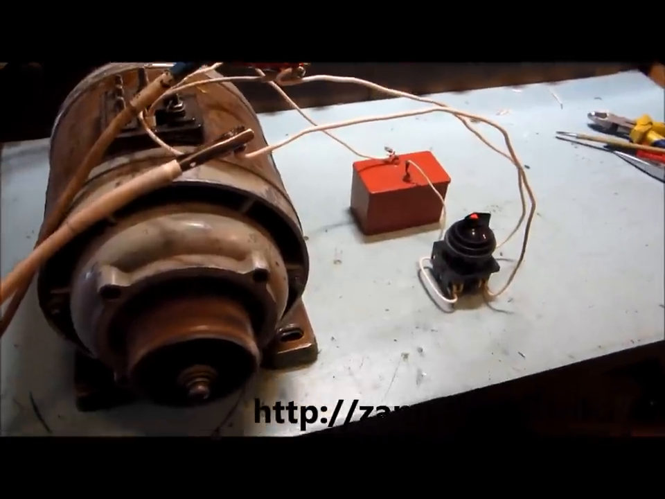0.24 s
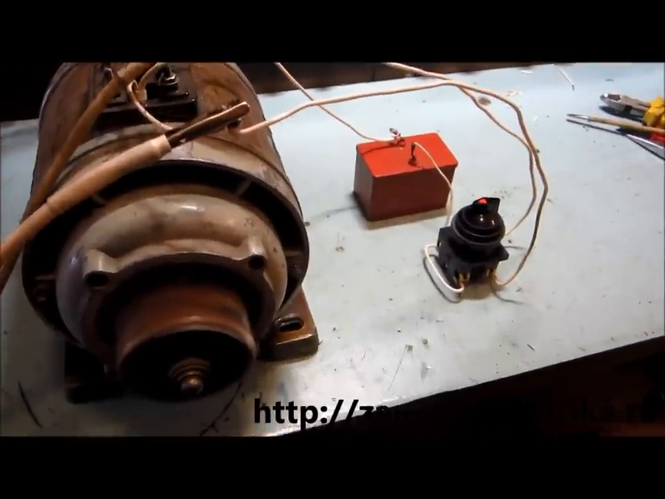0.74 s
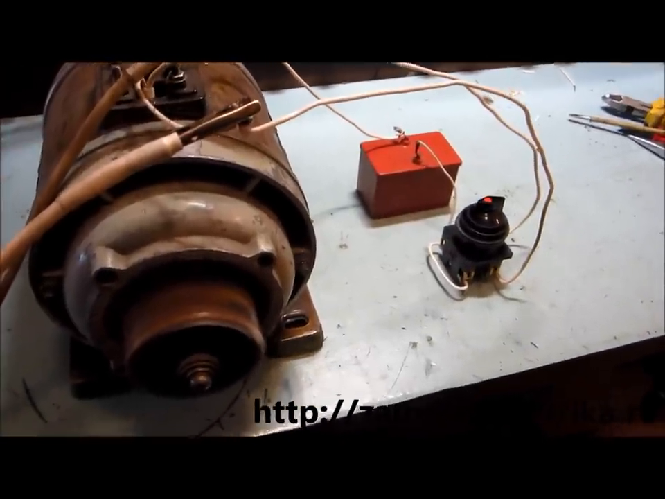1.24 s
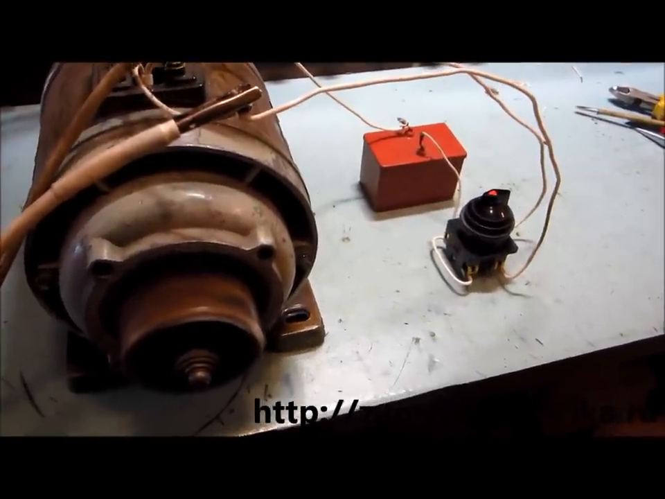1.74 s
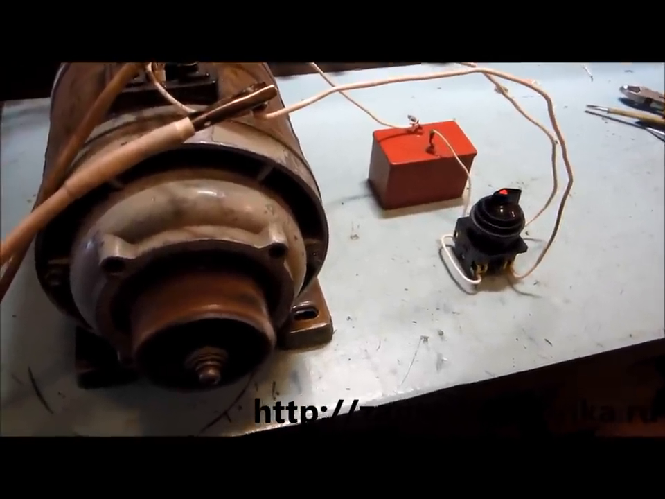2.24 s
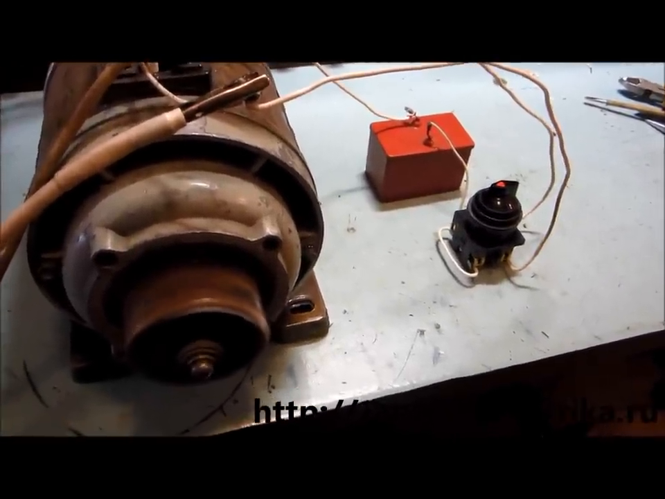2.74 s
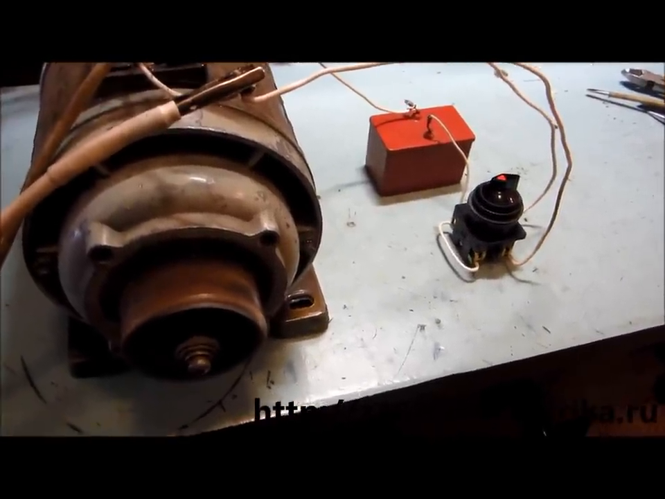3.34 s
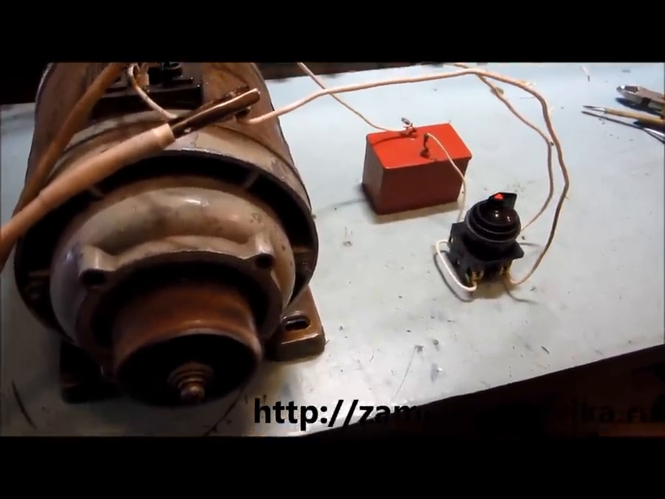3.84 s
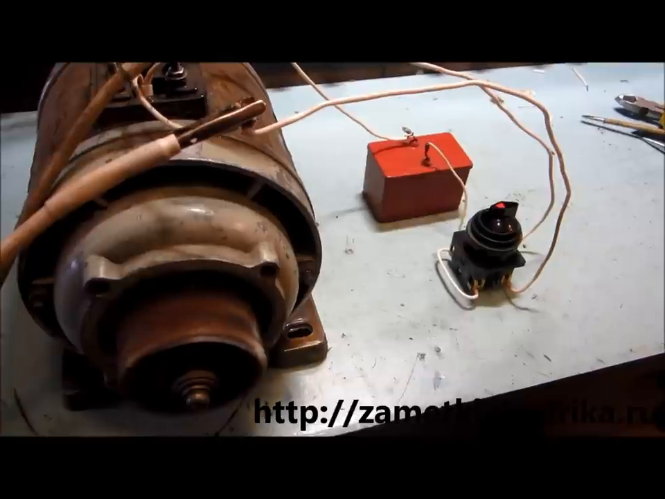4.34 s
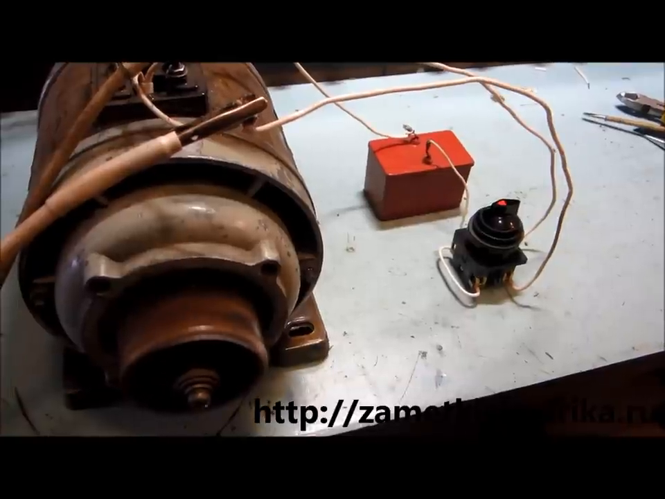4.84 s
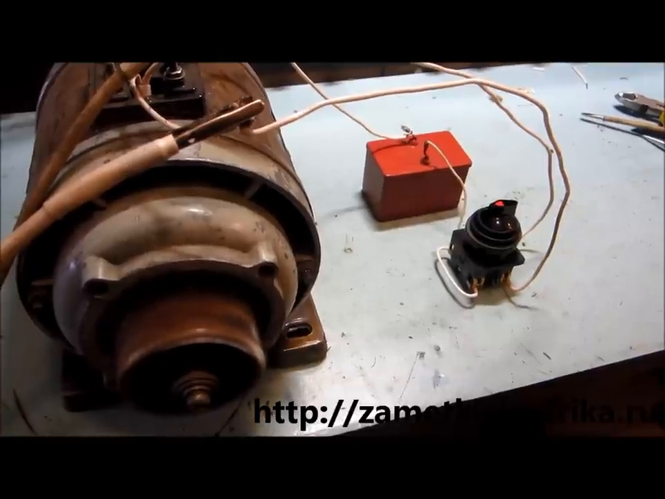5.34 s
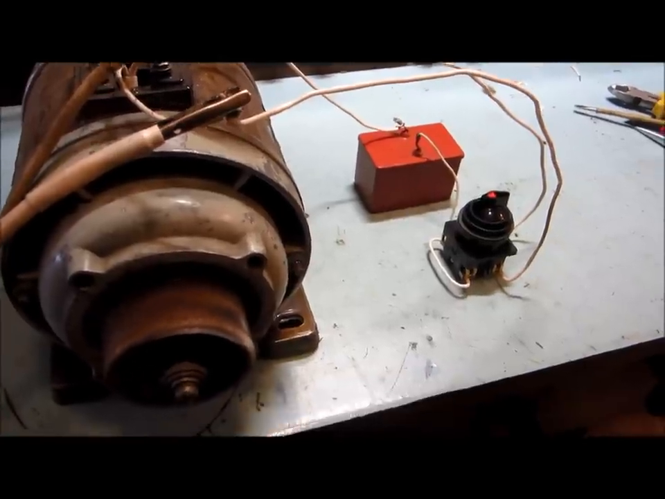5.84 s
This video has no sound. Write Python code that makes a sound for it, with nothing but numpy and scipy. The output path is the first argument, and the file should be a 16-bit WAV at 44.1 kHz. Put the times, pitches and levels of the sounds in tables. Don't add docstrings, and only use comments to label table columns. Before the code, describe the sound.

Harsh buzzing motor with clattering metal stops at a sharp snap; the rotor slows with rhythmic knocks over faint hiss, then handling clicks close by.

```python
import sys
import numpy as np
from scipy import signal
from scipy.fft import rfft, irfft
from scipy.io import wavfile

SR = 44100
rng = np.random.default_rng(int(sys.argv[2]) if len(sys.argv) > 2 else 0)


def materialize(psi):
    bounded = np.clip(np.atleast_2d(psi).T, -1, 1)
    quanta = np.round(bounded * 32767).astype(np.int16)
    wavfile.write(sys.argv[1], SR, quanta)


def attenuation_scalar(level_db):
    decades = np.asarray(level_db, float) / 20
    return 10 ** decades


N = 269182
TIME = np.arange(N) / SR
CUT_S = 1.423
MAINS_HUM_HZ = 100.0


def evened(x):
    return x / np.sqrt(np.mean(x ** 2) + 1e-20)


def curves(rows):
    s, *columns = np.transpose(rows)
    return [np.interp(TIME, s, c) for c in columns]


def drift(per_s):
    t = TIME[::64]
    waves = [np.sin(2 * np.pi * (f * t + rng.random())) for f in np.geomspace(per_s / 8, per_s, num=8)]
    return np.interp(TIME, t, evened(sum(waves)))


def resonate(x, hz, width):
    r = np.exp(-np.pi * width / SR)
    if np.ndim(hz) == 0:
        return 2 * signal.lfilter([1 - r], [1, -r * np.exp(2j * np.pi * hz / SR)], x).real
    turn = np.exp(2j * np.pi * np.cumsum(hz) / SR)
    return 2 * (turn * signal.lfilter([1 - r], [1, -r], x / turn)).real


def colour(x, points):
    hz, db = np.transpose(points)
    bins_hz = np.fft.rfftfreq(len(x), 1 / SR)
    return irfft(rfft(x) * attenuation_scalar(np.interp(np.log(bins_hz + 1), np.log(hz), db)), len(x))


def modes(table):
    t = np.arange(8192) / SR
    return sum(attenuation_scalar(db - 60 * t / t60) * np.sin(2 * np.pi * hz * t) for hz, db, t60 in table)


def burst(t60, rise_s):
    t = np.arange(12000) / SR
    return rng.standard_normal(len(t)) * attenuation_scalar(-60 * t / t60) * (1 - np.exp(-t / rise_s))


def add(mix, s, sound):
    part = mix[round(s * SR):][:len(sound)]
    part += sound[:len(part)]


def ring_out(fast_db, slow_db, tail_db):
    after = np.maximum(TIME - CUT_S, 0)
    return (1 - attenuation_scalar(tail_db)) * attenuation_scalar(fast_db * after) + attenuation_scalar(tail_db + slow_db * after)


# pitch_hz, width_hz, powered_db, bearing_hiss_db
FRAME = [(131, 51, -17, -1.5), (335.6, 29.3, -4.5, -0.5), (471, 42, -10, -5), (604, 188, -11, -9.5),
         (900, 109, -7, -8.5), (1308, 72, -9, -15.5), (1702, 131, -11.5, -19), (2100, 73, -11, -18),
         (2404, 314, -16.5, -20.5), (3205, 114, 0.5, -9), (3666, 340, -7.5, -20), (4250, 92, -14.5, -30),
         (4394, 96, -9.5, -17.5), (4900, 280, -9.5, -15), (5500, 300, -15, -20.5), (6900, 910, -20.5, -19),
         (7920, 180, -43, -17.5), (9000, 630, -26.5, -21.5), (10000, 300, -52, -22), (10440, 340, -31, -24),
         (13800, 2000, -60, -31)]


def frame(x, column):
    t = np.arange(4096) / SR
    ring = np.zeros(len(t))
    for k, mode in enumerate(FRAME):
        hz, width = mode[:2]
        decay = width * np.exp(-np.pi * width * t)
        ring += (-1) ** k * attenuation_scalar(mode[column]) * decay * np.sin(2 * np.pi * hz * t)
    return signal.oaconvolve(x, ring / np.linalg.norm(ring))[:N]


SLOT_ORDERS = [6, 8, 13, 14, 18, 19, 21, 22, 23, 25, 26, 36, 37, 40]
# level_db (rms), waver_db
SLOT_LEVELS = [(-56.5, 9.5), (-53.5, 5), (-42.5, 0), (-44, 3.5), (-40, 4), (-38.5, 3), (-49.5, 3.5),
               (-23.5, -0.7), (-61, 8), (-46, 5), (-37, 1), (-36.5, 0), (-43, 1.5), (-40, 1)]


def field():
    run_rps, hum_db = 24.963, -31.5
    hum = attenuation_scalar(hum_db + 0.28 * drift(4)) * np.sin(2 * np.pi * MAINS_HUM_HZ * TIME)
    tones = np.zeros(N)
    for order, (db, waver_db) in zip(SLOT_ORDERS, SLOT_LEVELS):
        level = attenuation_scalar(db + waver_db * drift(21.96))
        tones += level * np.sin(2 * np.pi * (order * run_rps * TIME + rng.random()))
    return np.sqrt(2) * (hum * ring_out(-600, -200, -11.5) + tones * ring_out(-600, -150, -7.5))


TAP_DB = -18
# start_s, blow_db, rebound_db, edge_db (extra treble)
RATTLES = [(.0383, -14.5, -19, -20), (0.0781, -11.5, -22, -5), (0.1081, -12.5, -14, -11),
           (.157, -33, -18.5, -16), (0.198, -12, -21, -20), (.2268, -15.5, -14, -14),
           (0.268, -14, -11.5, -12), (0.3184, -19, -13.5, -17), (0.3597, -14, -19.5, -20),
           (0.3996, -13.5, -14.5, -7), (.4381, -9.5, -13.5, -9), (.4776, -13, -18, -22),
           (0.5188, -16, -18, -14), (0.5873, -13, -32, -2), (0.6284, -15, -17, -18), (0.6785, -14, -17, 2),
           (0.7196, -14.5, -12, 4), (0.8102, -12.5, -43, -17), (0.839, -13.5, -17, -5),
           (.8802, -18, -42, 2), (0.9171, -12.5, -27, -1), (.958, -11.5, -20, -2),
           (1.0399, -19, -17.5, -12), (1.0805, -14.5, -17, -1), (1.1202, -28, -14.5, -16),
           (1.1585, -11.5, -13, -16), (1.2002, -10.5, -13, 0.5), (1.2794, -12.5, -39, -21),
           (1.3585, -11, -10.5, -2), (1.3996, -9, -12, -19)]
TURN_PATTERN_DB = np.array([0.5, -9.5, 2, 3])


def strikes():
    s, blow_db, rebound_db, edge_db = np.transpose(RATTLES)
    rebound_s, rebound_edge_db = 0.0108, -9
    rebounds = np.c_[s + rebound_s, rebound_db, rebound_edge_db + 0 * s]
    hard = np.r_[np.c_[s, blow_db, edge_db], rebounds]

    first_s, scatter_s, sag_db_per_s, spread_db, tap_edge_db = 0.0092, 0.0012, -5.5, 3.5, -12
    pulse = np.arange(int(CUT_S * MAINS_HUM_HZ) - 1) / MAINS_HUM_HZ + first_s
    late, size = rng.standard_normal((len(pulse), 2)).T
    tap_db = TAP_DB + sag_db_per_s * pulse + np.resize(TURN_PATTERN_DB, len(pulse)) - spread_db * abs(size)
    taps = np.c_[pulse + scatter_s * late, tap_db, tap_edge_db + 0 * pulse]
    free = abs(pulse[:, None] - hard[:, 0]).min(axis=1) > 0.5 / MAINS_HUM_HZ
    return np.r_[hard, taps[free]]


def rattle():
    skip_s, skip_loss_db = 0.0027, -2
    plate_lag_s, plate_db, plate_follows, plate_spread_db = 0.001495, -13, 0.34, 3
    crack_db, crack_follows = -24.5, 0.85
    puff_lowpass = signal.butter(1, 9500, fs=SR)
    hit, edge, plate, crack = np.zeros((4, N))
    for s, db, edge_db in strikes():
        puff = signal.lfilter(*puff_lowpass, burst(t60=0.02, rise_s=0.00068))
        puff *= attenuation_scalar(db) / np.linalg.norm(puff)
        add(hit, s, puff)
        for lag_s, skip_db in [(0, 0), (skip_s * rng.uniform(0.72, 1.4), skip_loss_db)]:
            tick = burst(t60=0.007, rise_s=0.00018)[:1000]
            tick /= np.linalg.norm(tick)
            add(edge, s + lag_s, attenuation_scalar(db + edge_db + skip_db - 1.5) * tick)
            add(crack, s + lag_s, attenuation_scalar(crack_db + crack_follows * (db - TAP_DB) + skip_db) * tick)
        swell_db = (plate_follows - 1) * (db - plate_db) + plate_spread_db * rng.standard_normal()
        add(plate, s + plate_lag_s, attenuation_scalar(swell_db) * puff)

    shake = np.exp(2.2 * np.cos(2 * np.pi * MAINS_HUM_HZ * TIME)) * (TIME < CUT_S)
    tick_level = attenuation_scalar(8.7 * np.minimum(rng.exponential(1, N), 3))
    chatter = (rng.random(N) < 400 * shake / SR) * rng.choice([-1, 1], N) * tick_level
    roar = signal.lfilter(*signal.butter(4, 3600, fs=SR), rng.standard_normal(N)) * attenuation_scalar(2.1 * drift(30.21))
    roar += attenuation_scalar(-38.0) * np.diff(rng.standard_normal(N + 1)) * attenuation_scalar(2.3 * drift(81))
    drive = attenuation_scalar(-42) * evened(chatter) + attenuation_scalar(-26.5) * roar * ring_out(-700, -250, -0.45) + attenuation_scalar(15.5) * hit

    sizzle_band = signal.butter(3, [4600, 7500], "band", fs=SR, output="sos")
    sizzle = signal.sosfilt(sizzle_band, edge + crack)
    sizzle += attenuation_scalar(-0.5) * resonate(edge, 8900, 850) + attenuation_scalar(-13) * resonate(edge, 11800, 1000)
    sizzle += attenuation_scalar(-20) * signal.lfilter(*signal.butter(2, 12000, fs=SR), edge)
    plate_ring = resonate(plate, 3300, 100) + resonate(plate, 3320, 120)
    return frame(drive, column=2) + attenuation_scalar(14) * sizzle + attenuation_scalar(11) * plate_ring


# start_s, level_db, t60_s
SWITCH = [(1.4805, -12, 0.025), (1.4835, -17, 0.021), (1.482, -26.5, 0.2)]
# pitch_hz, level_db
SNAP = [(59, -36), (100, -15), (902, -0.5), (1240, -7), (2950, -4), (4500, -5.5), (5220, -12),
        (5680, -11.5), (12700, -16), (15700, -33)]
# pitch_hz, level_db, t60_s
JOLT = [(87, -49, 0.63), (138, -31.5, 0.46), (262, -40, 0.27), (473, -33, 0.48), (1360, -43, 0.55)]


def switch():
    snap, bench = np.zeros((2, N))
    for s, db, t60 in SWITCH:
        add(snap, s, attenuation_scalar(db) * burst(t60, rise_s=0.0013))
    fade = signal.windows.tukey(8192, 0.9) ** 0.5
    add(bench, SWITCH[0][0], modes(JOLT) * fade * attenuation_scalar(4.8 * drift(48)[:8192]))
    return attenuation_scalar(12.5) * colour(snap, SNAP) + bench


# angle_turns, speed_rev_per_s, slowing_rev_per_s2, easing_rev_per_s3
COAST = (8.39, 19.784, 4.1795, .465)


def turns():
    start, speed, slowing, easing = COAST
    settle_s, settle_turn = 1.8, 0.36
    t = TIME - 2
    return start + speed * t - slowing * t ** 2 / 2 + easing * t ** 3 / 6 + settle_turn * (TIME < settle_s)


# start_s, force_db, hardness_db, clack_hz
KNOCK = [(1.55, -5, -3.5, 820), (1.8, -5, -2.5, 775), (2.0, 1, -1.5, 866), (2.3, -1, -1.5, 930),
         (2.5, 0, 3, 796), (2.68, -1.5, 1, 720), (3.12, 0.5, 3, 778), (3.25, -1, -2, 816),
         (3.5, 2, -17, 815), (3.9, 2, -23, 870), (4.25, -2.5, -33, 910), (4.7, -26, -20, 890)]
# start_s, pitch_hz, level_db (over the ring)
SLAP = [(1.6, 1970, 6.5), (1.78, 2100, 5.5), (1.9, 1300, -11), (2.3, 1300, -8), (2.55, 2260, -4.5),
        (2.8, 2200, -12), (3.1, 2390, -3.5), (3.4, 1500, -14)]
# pitch_hz, level_db, t60_s
RING = [(1001, -0.5, 0.057), (1360, 5, 0.016), (1670, 1, 0.019), (2100, -4.5, 0.013)]
# pitch_hz, level_db, t60_s
PING = [(2200, -18, 0.004), (2850, -23, 0.0081), (3197, 0.5, 0.059), (3290, 8, 0.015), (3350, -5, 0.016),
        (4500, -21, 0.0079)]
BOOM_ORDERS = [7, 8, 10]
BOOM_ORDERS_DB = [0.5, -2, -3]


def knocks():
    force_db, hard_db, clack_hz = curves(KNOCK)

    def answer_db(db, share):
        return db + force_db + share * hard_db

    bounce_db = -2.5 + 0.32 * hard_db
    hits = np.diff(np.floor(turns()), prepend=0) * (TIME > 1.56) > 0
    train = np.zeros(N)
    for at, (size, late, again) in zip(np.flatnonzero(hits), rng.standard_normal((hits.sum(), 3))):
        add(train, at / SR, attenuation_scalar(0.56 * size) * np.hanning(9))
        for lag_s, db in [(0.0035, -7.5), (0.008, -5.5)]:
            bounce = attenuation_scalar(db + bounce_db[at] + 1.4 * again) * np.hanning(9)
            add(train, at / SR + lag_s * (1 + 0.06 * late), bounce)
    grit_envelope = signal.lfilter([1], [1, -np.exp(-1 / (0.0029 * SR))], train)
    gritty = train + 0.21 * grit_envelope * rng.standard_normal(N)

    def swelling(hz, narrow, wide):
        return evened(resonate(resonate(train, hz, narrow), hz, wide))

    def struck(table):
        return evened(signal.oaconvolve(gritty, modes(table))[:N])

    sweep = sum(attenuation_scalar(db) * np.sin(2 * np.pi * k * turns()) for k, db in zip(BOOM_ORDERS, BOOM_ORDERS_DB))
    boom = evened(resonate(resonate(sweep * (TIME > CUT_S), 136, 10.4), 133.4, 30))
    thud = swelling(333.3, 31, 59) + attenuation_scalar(-10.5 + 0.5 * hard_db) * swelling(487, 22, 60)
    bench = attenuation_scalar(answer_db(-52.5, 0.1)) * boom + attenuation_scalar(answer_db(-51, -0.054)) * thud
    gap = attenuation_scalar(answer_db(-52, -0.031)) * swelling(616, 170, 270)
    gap += attenuation_scalar(answer_db(-49, 0.38)) * swelling(clack_hz, 107, 270)
    slap_hz, slap_db = curves(SLAP)
    slap = evened(resonate(resonate(gritty, slap_hz, 900), slap_hz, 1400))
    ring = attenuation_scalar(answer_db(-54, 0.94)) * (struck(RING) + attenuation_scalar(slap_db) * slap)
    ping = attenuation_scalar(answer_db(-56, 2.2) + 2 * (TIME - 3)) * struck(PING)
    return bench + gap + ring + ping


# start_s, level_db (peak),
# centre_hz, width_hz
CLICKS = [(1.788, -35, 665, 150), (4.814, -22.5, 2980, 8100), (5.185, -32.5, 148, 60),
          (5.537, -34, 1230, 500), (5.537, -34, 427, 200), (5.728, -29, 700, 1200),
          (5.7439, -16, 6000, 9000), (5.8604, -25, 1160, 900), (5.861, -38, 4520, 2002),
          (5.8919, -10.5, 5500, 2480), (5.892, -12, 9100, 9000), (5.8921, -23, 1480, 1210),
          (5.8947, -16, 4900, 2020), (5.8939, -21, 1680, 1500), (5.903, -31, 914, 804),
          (5.923, -42, 1177, 900), (6.0106, -22, 1080, 696), (6.011, -31, 4050, 4000),
          (6.015, -29.5, 550, 500)]
# start_s, level_db (peak), centre_hz, width_hz, t60_s
SCRAPES = [(3.47, -49, 1415, 40, .25), (4.198, -57, 70, 40, 0.16), (5.13, -41, 3930, 900, 0.33),
           (5.732, -34, 5070, 5000, 0.039), (5.7409, -23.5, 3960, 6030, .016)]


def hand():
    tap_grit, scrape_grit = 0.18, 1.9
    touches = []
    for s, db, hz, width in CLICKS:
        t60 = 0.01 * (hz / 1e3) ** -0.49
        touches.append((s, db, hz, width, t60, tap_grit))
    touches += [(*row, scrape_grit) for row in SCRAPES]
    out = np.zeros(N)
    for s, db, hz, width, t60, grit in touches:
        touch = grit * burst(t60, rise_s=t60 / 25)
        touch[0] = 1
        click = resonate(resonate(touch, hz, width), hz, width)
        add(out, s, attenuation_scalar(db) * click / np.abs(click).max())
    return out


# start_s, hiss_db, rub_db, rub_hz, rub_place_turns (0-1)
WHIR = [(1.45, -46.5, -54, 778, 0.07), (1.7, -50.5, -58.5, 800, 0.34), (2.2, -49, -45, 794.5, 0.03),
        (2.55, -48, -51, 704.4, 0.05), (3.2, -47.5, -45.5, 827, 0.21), (3.9, -47, -47.5, 863, 0.19),
        (4.4, -48.5, -44.5, 900, 0.35), (4.7, -51.5, -51.5, 878, .33), (5.0, -52.5, -48.5, 923, 0.26),
        (5.5, -54, -50, 918.5, 0.36), (6.1, -58, -52, 887, .43)]


def whir():
    hiss_db, rub_db, rub_hz, place = curves(WHIR)
    hiss = evened(frame(rng.standard_normal(N) * attenuation_scalar(0.58 * drift(25)), column=3))
    pressing = np.cos(2 * np.pi * (turns() - place))
    swell = 0.4 + np.exp(2.6 * (pressing - 1))
    rub_hz = rub_hz + 44.84 * (pressing - 0.7)
    squeak = 1.6 * np.sin(2 * np.pi * np.cumsum(rub_hz + 12 * drift(20)) / SR)
    rub = squeak + evened(resonate(resonate(rng.standard_normal(N), rub_hz, 102), rub_hz, 133))
    rub = evened(rub * swell * attenuation_scalar(0.44 * drift(14)))
    return attenuation_scalar(hiss_db + 3.0) * hiss + attenuation_scalar(rub_db) * rub


# pitch_hz, level_db
AIR = [(12, -34), (20, -0.5), (202, -3.5), (617, -17.5), (862, -5), (1110, -17), (2420, -24), (3200, -15.5),
       (3890, -24), (4860, -21.5), (15700, -47)]
# pitch_hz, level_db
WHINE = [(10700, -78), (9880, -88), (15480, -88)]


def room():
    gain_db = np.interp(TIME, [1.6, 3.5, 4.5], [-9, -4, 0])
    rumble = evened(resonate(resonate(rng.standard_normal(N), 116, 93), 160, 210))
    shudder = attenuation_scalar(-38 - 110 * abs(TIME - 1.496))
    shaken = attenuation_scalar(-49 + 1.1 * gain_db) + shudder
    air = evened(colour(rng.standard_normal(N), AIR))
    whine = sum(attenuation_scalar(db + gain_db + 2.5 * drift(6)) * np.sin(2 * np.pi * hz * TIME) for hz, db in WHINE)
    return whine + shaken * rumble + attenuation_scalar(-45.5 + gain_db) * air


def scene():
    return (field() + rattle() + switch() + knocks() + hand() + whir() + room())[None]


def top_cut(x):
    return signal.sosfilt(signal.butter(12, 15810, fs=SR, output="sos"), x)


def record(dry):
    limited = signal.sosfilt(signal.butter(1, 24, "high", fs=SR, output="sos"), dry)
    limited = 0.75 * np.tanh(limited / 0.75)
    limited = signal.sosfilt(signal.ellip(12, 0.5, 70, 15800, fs=SR, output="sos"), limited)
    return top_cut(limited)


dry = scene()
out = record(dry)
materialize(out)
```